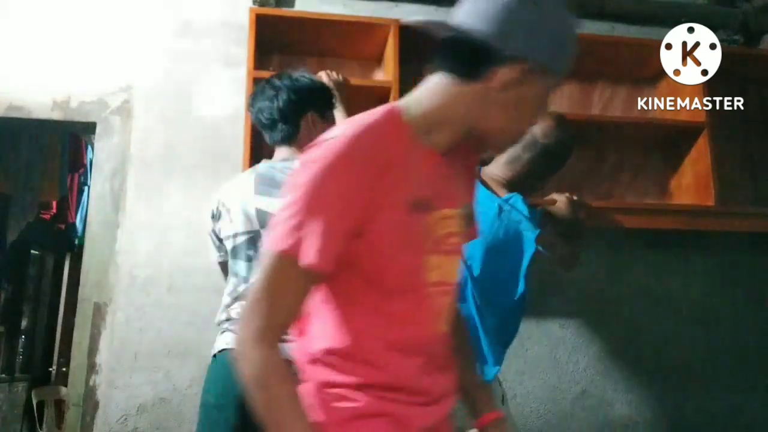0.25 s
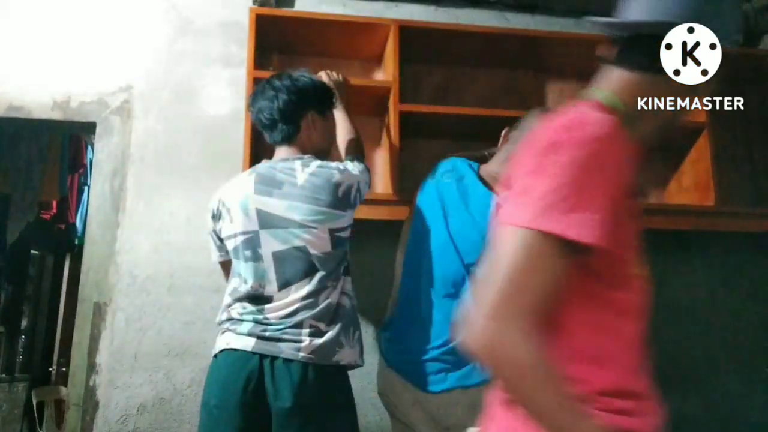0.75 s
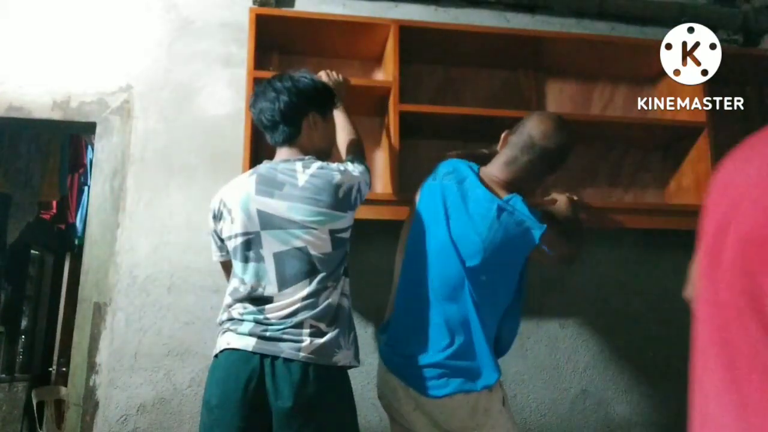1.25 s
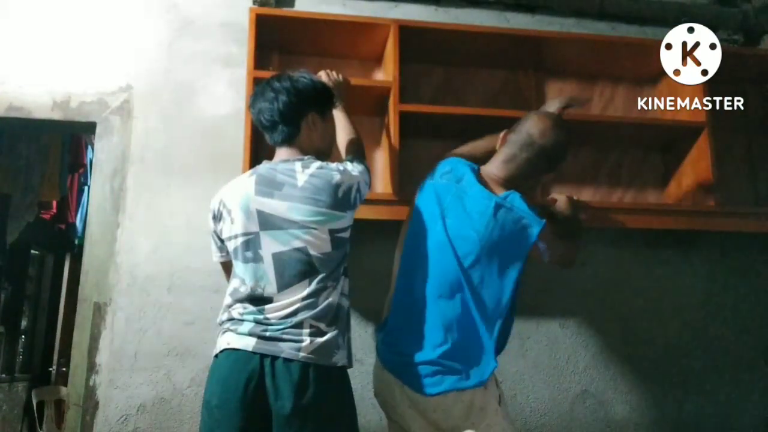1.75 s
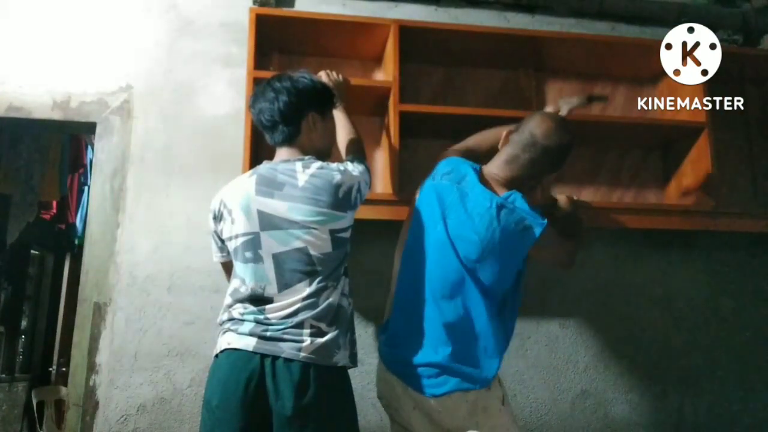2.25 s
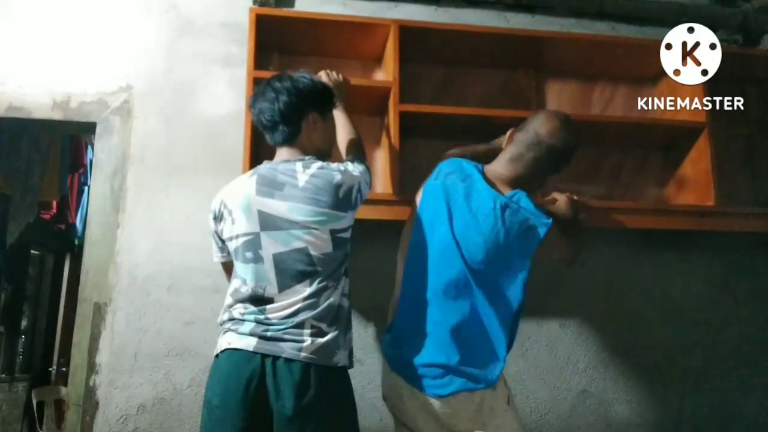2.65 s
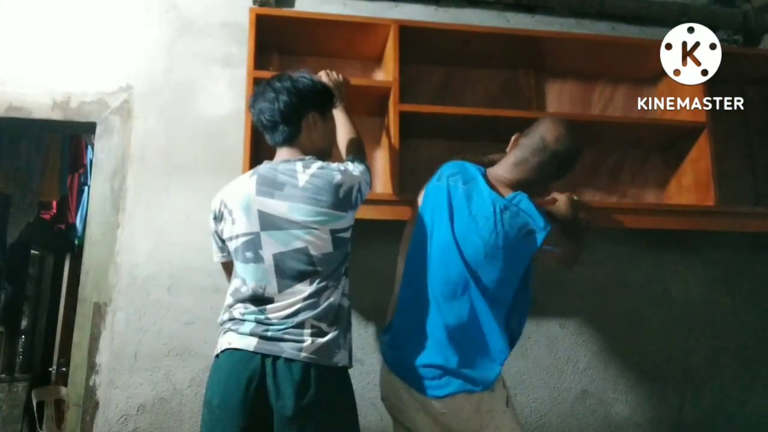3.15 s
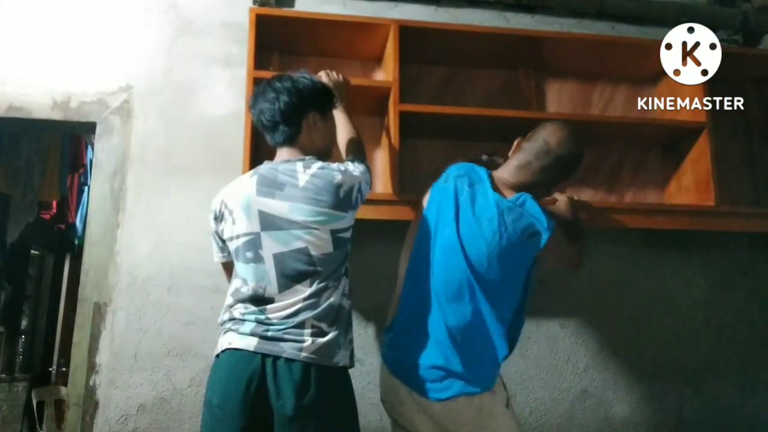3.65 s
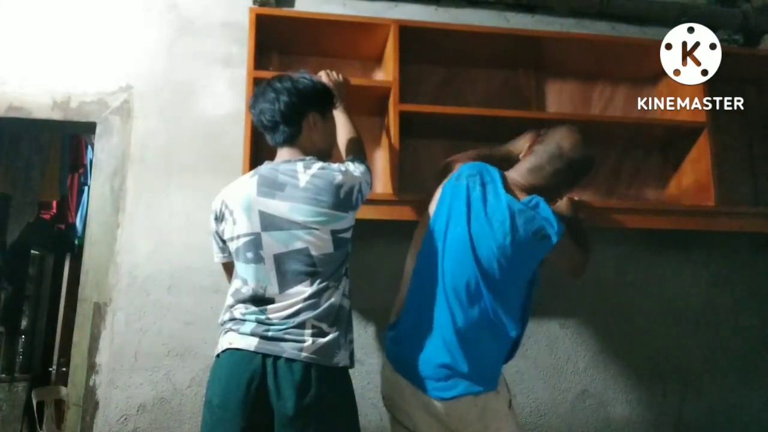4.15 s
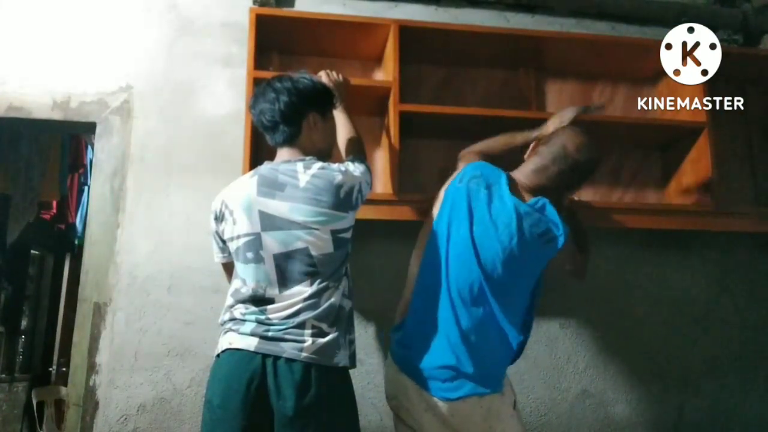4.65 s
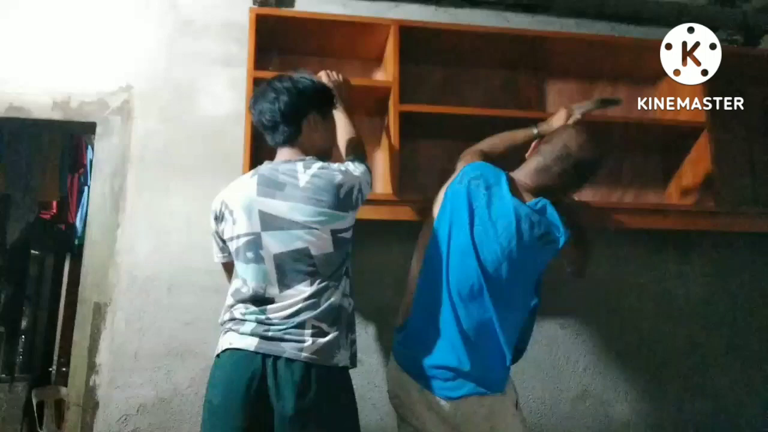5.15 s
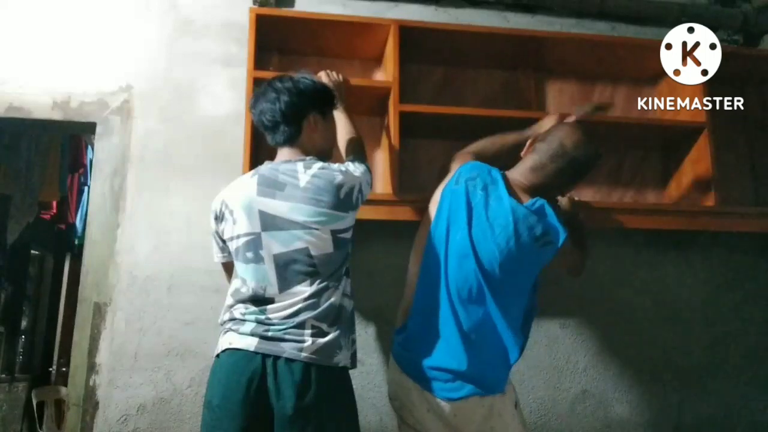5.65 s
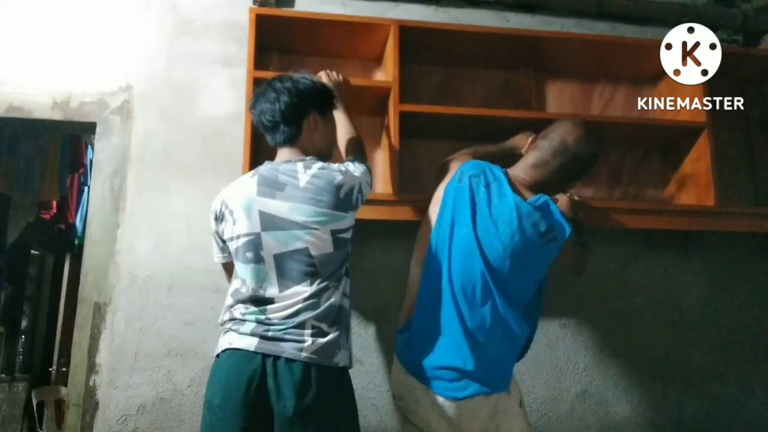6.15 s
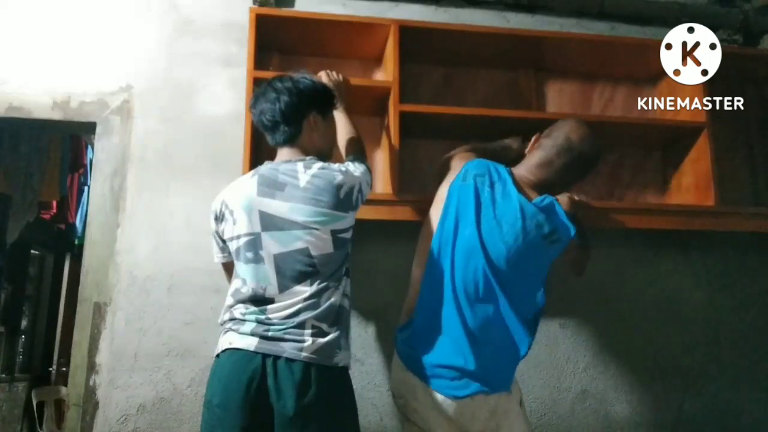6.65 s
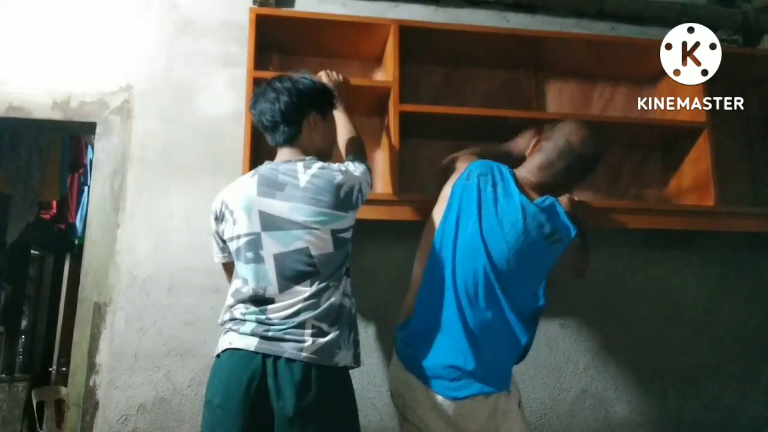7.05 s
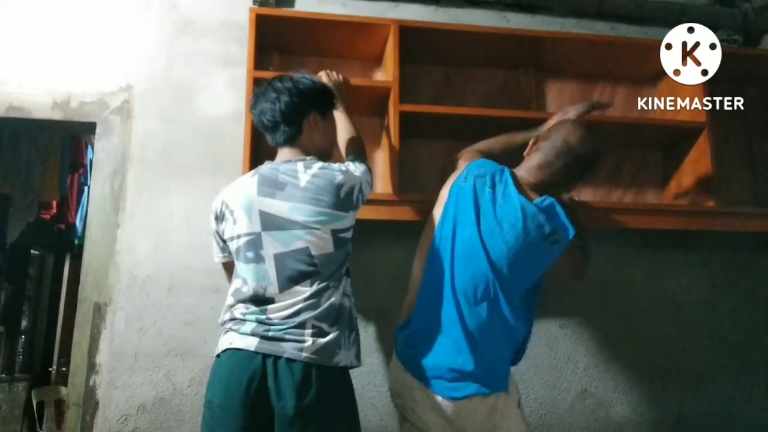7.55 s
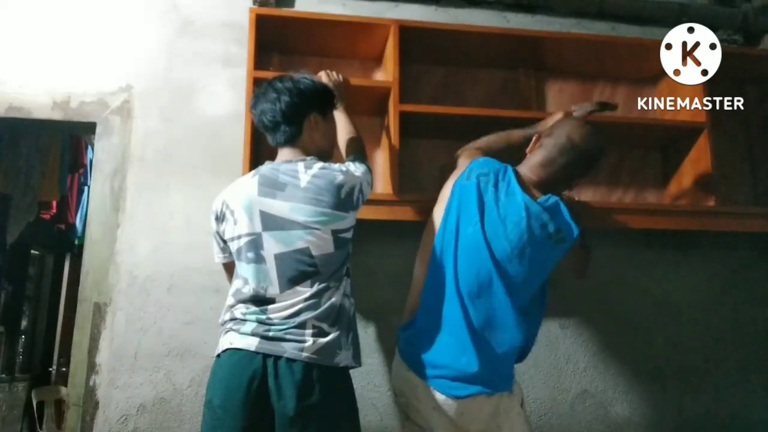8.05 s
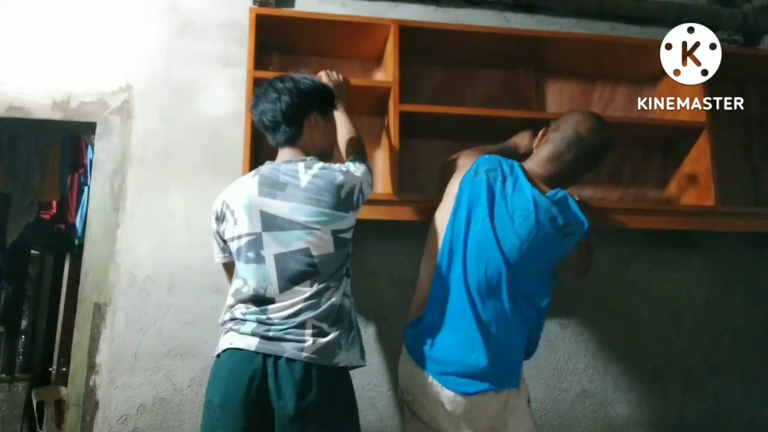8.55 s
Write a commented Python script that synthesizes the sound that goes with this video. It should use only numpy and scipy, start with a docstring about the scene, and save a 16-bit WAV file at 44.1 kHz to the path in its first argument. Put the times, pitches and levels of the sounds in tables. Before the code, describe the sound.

A hammer hits a wooden wall cabinet in a bare concrete room, steady loud blows about every 0.6 seconds, some with softer rebounds.

```python
"""Hammering inside a wall cabinet

A hammer drives nails through the back of a wooden wall cabinet in a bare concrete room.
Each blow sums filtered noise (steel crack), decaying modes (hollow knock), a pressure pulse and a
room tail; often the head rebounds and lands again, softer, or the boards clatter.
A phone microphone adds hiss, low rumble and rest-line jolts; its gain control ducks after each blow."""
import sys
import numpy as np
from scipy import signal
from scipy.fft import rfft, irfft
from scipy.io import wavfile
from scipy.ndimage import uniform_filter1d

SR = 44100
rng = np.random.default_rng(int(sys.argv[2]) if len(sys.argv) > 2 else 0)


def file_out(sig):
    """Save sig as 16-bit WAV at sys.argv[1]."""
    # one column per channel
    cols = np.atleast_2d(sig).T
    # limit, then scale
    lim = np.clip(cols, -1, 1)
    pcm = np.round(lim * 32767).astype(np.int16)
    wavfile.write(sys.argv[1], SR, pcm)


N = 388521  # length [samples]


def gain_of(db):
    """Decibel law: 20 dB is a factor of ten in amplitude."""
    return 10 ** (np.asarray(db) / 20)


def unit_rms(x):
    """Normalization to a root-mean-square of one."""
    return x / np.sqrt(np.mean(x ** 2) + 1e-20)


def read_curve(points, hz):
    """Interpolation along a logarithmic frequency axis, as pitch is heard."""
    point_hz, value = np.transpose(points)
    return np.interp(np.log(hz + 1), np.log(point_hz + 1), value)


def add(mix, start_s, sound):
    """Superposition: sound pressures add, in place."""
    part = mix[round(start_s * SR):][:len(sound)]
    part += sound[:len(part)]


def coloured(x, db_at):
    """Linear filtering: each frequency is scaled by a dB curve given as a function of frequency."""
    hz = np.fft.rfftfreq(len(x), 1 / SR)
    return irfft(rfft(x) * gain_of(db_at(hz)), len(x))


def noise(spectrum, rms_db, patchy_db):
    """Gaussian noise: random short-time spectra, their level drifting in time-frequency patches."""
    frames = N // 256 + 5
    real, imaginary, patches = rng.standard_normal((frames, 513, 3)).T
    patches = uniform_filter1d(patches, 12, 0)  # across frequency
    patches = unit_rms(uniform_filter1d(patches, 14, 1))  # across time
    spectra = (real + 1j * imaginary) * gain_of(patchy_db * patches)
    x = signal.istft(spectra, nperseg=1024, noverlap=768)[1][:N]
    even_length = np.pad(x, (0, N % 2))
    shaped = coloured(even_length, lambda hz: read_curve(spectrum, hz))[:N]
    return gain_of(rms_db) * unit_rms(shaped)


def hush():
    """Stationary background noise: rumble from outside and the hiss of air and microphone."""
    # spectral shapes: (frequency [Hz], relative level per hertz [dB])
    rumble_shape = [(10, -25), (20, 0.5), (49, -2.5), (66, -19), (96, 0), (125, -5.5), (160, -4.5),
                    (200, -13), (260, -19), (400, -18.5), (600, -20), (1100, -19.5), (1500, -25),
                    (2500, -41), (15600, -47), (15900, -90)]
    hiss_shape = [(600, -36), (1500, -2), (2500, 2.5), (3500, -0.5), (5000, -7), (6000, -6), (6800, 1),
                  (7800, -5), (9000, -13.5), (12000, -14.5), (14000, -10), (15300, -5), (15700, -17),
                  (15900, -60)]
    rumble = noise(rumble_shape, rms_db=-48.5, patchy_db=0.56)
    hiss = noise(hiss_shape, rms_db=-59, patchy_db=-0.9)
    return rumble + hiss


def crack(db_at, length_s):
    """Broadband impact: steel on steel gives a few ms of chattering noise in uneven bands."""
    t = np.arange(SR // 4) / SR
    bands_db = list(zip(np.linspace(1000, 16000, num=40), 2.63 * rng.standard_normal(40)))
    chatter_db = 1.5 * unit_rms(uniform_filter1d(rng.standard_normal(len(t)), 30))
    burst = coloured(rng.standard_normal(len(t)), lambda hz: db_at(hz) + read_curve(bands_db, hz))
    onset = 1 - np.exp(-t / 0.0003)
    decay = np.exp(-(t / length_s) ** 1.4)
    return burst * gain_of(chatter_db) * onset * decay


def knock(panels, lag_s, swell_s, scatter_db):
    """Modal synthesis: decaying sines swell over a few ms as the blow spreads through the boards."""
    # cabinet modes: (frequency [Hz], relative level [dB], decay time for 60 dB [s])
    modes = [(100.5, -5.5, 0.37), (159.2, 3, 0.28), (238.5, 6, 0.11), (295.5, -5.5, 0.41),
             (336, -2.5, 0.14), (431, 8.5, 0.14), (485, -3.5, 0.15), (542.6, 5.5, 0.11), (671, 8, 0.033),
             (732.7, 8, 0.044), (807, -10.5, 0.074), (870, -5.5, 0.19), (952, -7.5, 0.16),
             (1064, 10, 0.042), (1243, 1, 0.057), (1494, 2, 0.032), (1628, -5.5, 0.098), (1840, -21, 0.049),
             (2070, -8, 0.1), (2496, -11, 0.051)]
    hz, db, t60 = np.array(modes).T[:, :, None]
    db = db + read_curve(panels, hz) + scatter_db * rng.standard_normal(hz.shape)
    # bending waves are slower at low pitch, so the low modes start later; lag_s holds at 700 Hz
    t = np.maximum(np.arange(SR // 4) / SR - lag_s * np.sqrt(700 / hz), 0)
    sign = (-1.) ** np.arange(len(hz))[:, None]
    swell = 1 - np.exp(-t / swell_s)
    decay = gain_of(db - 60 * t / t60)
    return (sign * swell * decay * np.sin(2 * np.pi * hz * t)).sum(0)


def room_tail(db_at, gap_s, build_s):
    """Reverberation: sparse reflections of a coloured pulse, each band decaying at its own speed."""
    # reverberation time: (frequency [Hz], decay time for 60 dB [s])
    reverberation = [(60, 1), (160, 0.81), (420, 0.46), (1100, 0.33), (2900, 0.27), (7700, 0.26),
                     (15000, 0.19)]
    taps = np.zeros(SR // 2)
    # one reflection of random sign, somewhere in every 16 samples
    cells = len(taps) // 16
    places = np.arange(cells) * 16 + rng.integers(0, 16, cells)
    taps[places] = rng.choice([-1., 1.], cells)
    hz, t, spectra = signal.stft(taps, SR, nperseg=512, noverlap=384)
    decay_db = 60 * t / read_curve(reverberation, hz)[:, None]
    spectra = spectra * gain_of(db_at(hz)[:, None] - decay_db)
    tail = signal.istft(spectra, SR, nperseg=512, noverlap=384)[1][:len(taps)]
    t = np.arange(len(tail)) / SR
    return tail * (1 - np.exp(-np.maximum(t - gap_s, 0) / build_s))


def strike(knock_db, hollow, tilt_db, middle_db, crack_db, middle_drop_db, top_drop_db, lag_s,
           crack_s, drier_db=0):
    """Impact excitation: one landing of the head drives steel, panels and room together."""
    # how a landing shares out over the panels, while the nail stands proud and once it is seated
    # and the box sounds hollow: (frequency [Hz], proud relative level [dB], seated relative level [dB])
    panel_shares = [(242, -4.5, -7), (419, -2, -2), (554, -0.4, 2.5), (745, -1.5, 12.5), (1140, 2.5, -6.5),
                    (1480, -0.8, -4.5)]
    # low, middle and top of the crack: (frequency [Hz])
    crack_hz = [3000, 6030, 12600]
    # colour of the crack: (frequency [Hz], relative level [dB])
    crack_colour = [(150, -45), (700, -13.5), (2000, -5), (3850, 0), (5000, -2.5), (6600, 4.5), (8500, -6),
                    (11000, -6.5), (15000, -3.5), (15500, 6), (15800, -36), (16800, -51)]
    # change of colour in the second crack: (frequency [Hz], level change [dB])
    second_colour = [(3000, -0.9), (7000, -1.5), (14000, -5.5)]
    # share of the blow that fills the room: (frequency [Hz], relative level [dB])
    room_colour = [(40, 27), (150, 30.5), (450, 34.5), (730, 26.5), (1300, 29), (2200, 16.5), (3850, 14.5),
                   (5000, 12.5), (6700, 21), (8500, 11), (11000, 6), (15000, 11), (15600, 18), (15900, -30)]

    panels = []
    for row, (hz, proud_db, seated_db) in enumerate(panel_shares):
        share_db = (1 - hollow) * proud_db + hollow * seated_db
        tilted_db = knock_db + share_db + tilt_db * np.log2(hz / 700)
        panels.append((hz, tilted_db + middle_db * (row == 2)))  # row 2 is the middle panel
    steel = list(zip(crack_hz, [crack_db, crack_db - middle_drop_db, crack_db - top_drop_db]))
    blow = panels + steel
    bright = [(1100, crack_db + 10.0)] + steel

    def first_db(hz):
        return read_curve(crack_colour, hz) + read_curve(bright, hz)

    def second_db(hz):
        return first_db(hz) + read_curve(second_colour, hz)

    # the later the knock sets in, the slower it swells and the less of it fills the room
    wood = knock(panels, lag_s, swell_s=0.0011 + 0.89 * lag_s, scatter_db=1.87)
    room_db = 1.92 - 1.61 * 1000 * lag_s - drier_db
    # the crack comes twice: steel meets steel, then a second, duller crack 4 ms later
    first = gain_of(7.5) * crack(first_db, crack_s)
    second = gain_of(7.5) * crack(second_db, crack_s)
    # the room hears the whole blow as one pulse, and the cabinet's ring on top
    wash = room_tail(lambda hz: read_curve(room_colour, hz) + read_curve(blow, hz),
                     gap_s=0.002, build_s=0.004)
    flat_tail = room_tail(np.zeros_like, gap_s=0.0014, build_s=0.0022)
    echoes = signal.fftconvolve(wood, flat_tail)[:len(wash)]
    sound = gain_of(room_db) * (wash + gain_of(-28.5) * echoes)
    add(sound, 0, wood + first)
    add(sound, 0.004, second)
    return sound


def thud(db, length_s):
    """Volume displacement: the back board jumps away from the listener, one short pull on the air."""
    u = np.arange(SR // 10) / SR / length_s
    return -gain_of(db) * u * (1 - u / 7.6) * np.exp(1 - u)


def jolt(size, rise_s, back_s):
    """High-pass step response: a step that leaks away and overshoots."""
    t = np.arange(SR // 2) / SR
    return size * (1 - np.exp(-t / rise_s)) * (1 - t / back_s) * np.exp(-t / back_s)


def tick(db):
    """Resonant click: a small pulse that rings on in the room, heard mostly in the microphone's treble peak at
    6.9 kHz."""
    return gain_of(db + 4) * room_tail(lambda hz: -30 * abs(np.log(hz / 6900 + 1e-9)),
                                       gap_s=0, build_s=0.0006)


def scene():
    """Superposition of background, blows, rebounds and ticks."""
    # full blows: (time [s], relative knock level [dB], hollowness [0-1], knock tilt [dB per octave],
    #  extra ring of the middle panel [dB], relative crack level [dB], drop of the crack's middle [dB],
    #  drop of its top [dB], relative thud level [dB], lag of the knock at 700 Hz [s])
    blows = [(0.0415, -52.5, 0.3, 7.5, 6.5, -39.5, 2.5, -2.5, -49, 0.0031),
             (0.2445, -23, 0.23, 2.5, .1, -17.5, 4.5, 1.8, -24, .0016),
             (0.817, -21.5, .05, 0.4, 1, -22.5, 1.2, -3.5, -21, 0.003),
             (1.401, -21, 0, 0.7, -2.5, -21, 1.5, 0, -30, .0032),
             (1.989, -21.5, 0.1, 0.3, -0.3, -22.5, -1, 3.5, -43, 0.0029),
             (2.5718, -20.5, 0.5, -0.3, 0, -23, 1, 2, -34, 0.0031),
             (3.1678, -22.5, 0.72, 0.4, 3, -26.5, -0.2, -3.3, -31, 0.0031),
             (3.7488, -19.5, .85, 0.4, -1, -21, 3.5, .6, -19, 0.0029),
             (4.3235, -23, 0.89, -0.2, -2, -21.5, 8, 6.5, -21, .0029),
             (4.9033, -19, 0.65, 2, 2.5, -17, 8, 5.5, -21, 0.00071),
             (5.4939, -21.5, 1, 0, -1, -24.5, 7, -0.5, -31, 0.0035),
             (6.0714, -22.5, 0.95, 1, -1, -25, 7.5, 2, -34, .003),
             (6.636, -21, 0.85, 0.5, -1, -22, 4, 6.5, -24, 0.0032),
             (7.2111, -22, 0.9, 0.4, 1, -25.5, 5.5, 3.5, -29, .0035),
             (7.7956, -19.5, 0.68, 1.2, 0, -19.5, 7, 3.5, -29, 0.0032),
             (8.3746, -20.5, 0.68, 2.5, 0, -22, 7, 5.5, -29, .0021)]
    # softer landings or clatter of the boards: (time [s], relative knock level [dB], hollowness [0-1],
    #  knock tilt [dB per octave], extra ring of the middle panel [dB], relative crack level [dB])
    rebounds = [(2.6622, -31.5, 0.7, 3.5, -12, -36), (2.682, -39, 0.4, .1, 12.5, -41),
                (2.6986, -38.5, .05, 1, -1, -45), (2.716, -40.5, 0.1, 6, -6, -38),
                (2.739, -53, 0.27, 4, -2, -48), (3.2386, -29.5, 0.85, 2.7, -5, -38),
                (3.801, -39, 0.5, 2, .1, -41), (4.377, -38, .6, -0.5, 4, -47),
                (5.5474, -32.5, 0.3, 9.5, 8, -25.5), (6.12, -27, .3, 4.5, -7, -24.5),
                (6.706, -33.5, 0.3, 5.5, -4, -35), (7.256, -28, 0.47, 5.5, -7, -25),
                (7.2686, -33, 0.7, 2, 2, -48), (7.848, -39, 0.4, -1.5, 2, -49),
                (8.4365, -27, 0.86, 5, -1, -30)]
    # faint high ticks: (time [s], relative level [dB])
    ticks = [(1.6594, -41), (6.4305, -38.5), (6.8857, -43)]
    mix = hush()
    for start_s, *colour, thud_db, lag_s in blows:
        add(mix, start_s, strike(*colour, lag_s, crack_s=0.0052))
        add(mix, start_s, thud(thud_db, length_s=0.0017))
    for start_s, *colour in rebounds:
        add(mix, start_s, strike(*colour, middle_drop_db=16.5, top_drop_db=23, lag_s=0.0022,
                                 crack_s=0.0031, drier_db=2))
    for start_s, db in ticks:
        add(mix, start_s, tick(db))
    return mix[None]


def record(dry):
    """Compression, saturation and band limiting: gain ducks, peaks round off, the rest line jolts."""
    # the microphone's rest line jumps under some blows and swings slowly back:
    # (time [s], signed step before its rise and decay [fraction of full scale])
    jolts = [(0.247, 0.066), (0.823, -.045), (1.411, -.028), (3.750, -0.021), (4.326, -0.036),
             (4.905, 0.058), (4.918, -0.11), (6.643, 0.058), (8.383, 0.024)]
    power_db = 10 * np.log10(abs(uniform_filter1d(dry[0] ** 2, 600)) + 1e-12)
    # peak hold whose held level falls 17 dB a second
    fall_db = np.arange(N) * 17.0 / SR
    held_db = np.maximum.accumulate(power_db + fall_db) - fall_db
    over_db = np.maximum(held_db + 30.5, 0)  # threshold at -30.5 dB
    # the shifted average looks back 9 ms, so the gain ducks gradually
    ducked = dry[0] / gain_of(0.14 * uniform_filter1d(over_db, 400, origin=199))
    rounded = 0.62 * np.tanh(ducked / 0.69)
    for start_s, size in jolts:
        add(rounded, start_s, jolt(size, rise_s=0.0035, back_s=0.066))
    low_pass = signal.firwin(511, 16800, window=("kaiser", 9), fs=SR)
    return signal.oaconvolve(rounded, low_pass, "same")[None]


dry = scene()
out = record(dry)
file_out(out)
```